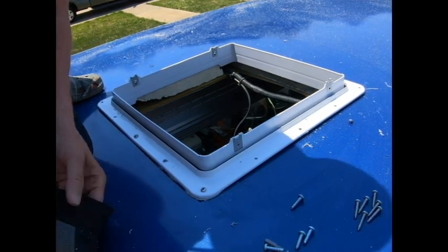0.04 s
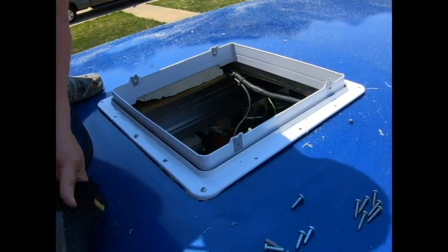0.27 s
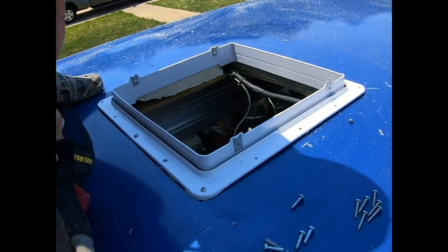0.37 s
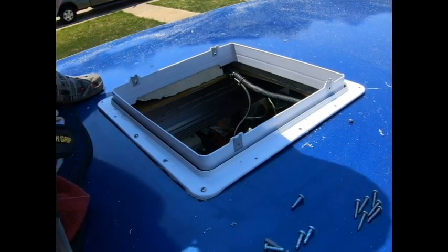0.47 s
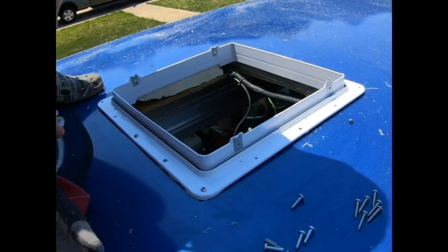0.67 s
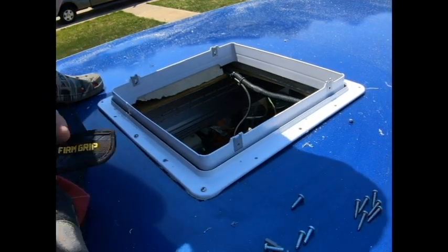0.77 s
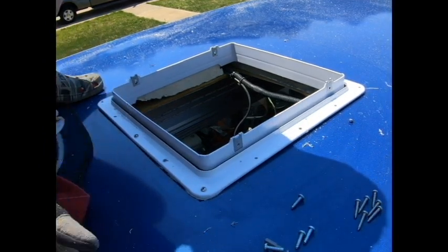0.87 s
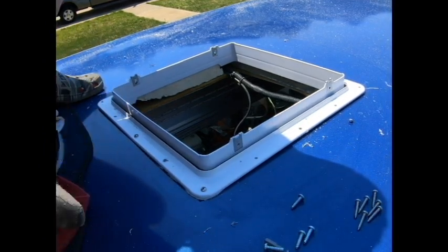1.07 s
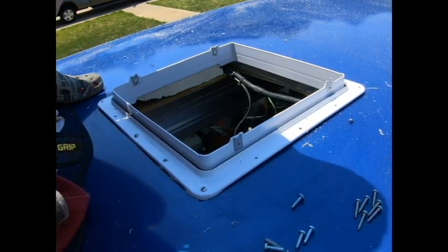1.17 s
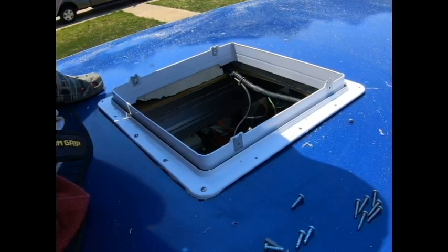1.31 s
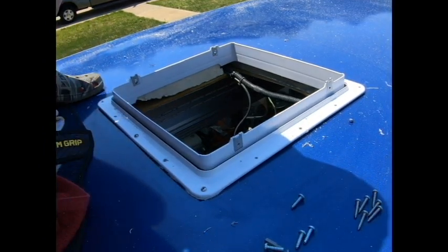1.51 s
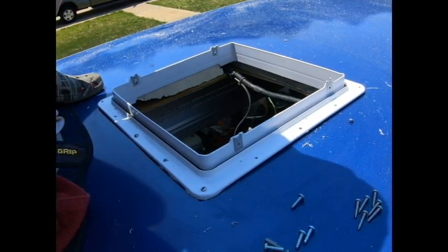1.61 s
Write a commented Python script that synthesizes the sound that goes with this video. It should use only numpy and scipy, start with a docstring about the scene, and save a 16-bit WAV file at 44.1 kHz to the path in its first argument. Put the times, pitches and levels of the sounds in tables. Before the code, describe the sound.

A tool bag lands on a van's sheet-metal roof with two low, briefly ringing thumps at about 0.15 and 0.3 seconds, its hard feet clicking with them. From 0.7 to 1.2 seconds the cloth slides softly over the paint with a thin whistle, followed by a few small scuffs until 1.6 seconds. Faint outdoor air and a low, wavering hum, probably a distant engine, continue throughout.

```python
"""A tool bag is set down on a van's sheet-metal roof: its hard feet tick, then its weight lands
in two low thumps that make the metal ring. Afterwards the cloth scuffs and slides over the paint,
making a rubbing noise with a thin whistle. Behind it a low hum, probably a far engine, wavers
over faint outdoor air."""
import sys
import numpy as np
from scipy import signal
from scipy.fft import rfft, irfft, next_fast_len
from scipy.io import wavfile
from scipy.ndimage import map_coordinates

SR = 44100
rng = np.random.default_rng(int(sys.argv[2]) if len(sys.argv) > 2 else 0)


def to_wav(sig):
    """Store sig (one row per channel, or 1-D mono) as 16-bit WAV at the path in sys.argv[1].

    Samples outside -1..1 are clipped; the rate is SR.
    """
    pcm = np.clip(np.atleast_2d(sig), -1, 1) * 32767
    pcm = np.round(pcm).astype(np.int16)
    wavfile.write(sys.argv[1], SR, pcm.T)  # frames by channels


N = 72765


def amp(db):
    """Turn decibels into a number to multiply a sound by."""
    return 10 ** (np.asarray(db) / 20)


def unit(x):
    """Scale a sound so its average strength (rms) is 1."""
    return x / np.sqrt(np.mean(x ** 2) + 1e-20)


def clock():
    """The time of each sample, in seconds."""
    return np.arange(N) / SR


def curves(rows):
    """Join a table's points with lines: one curve for each column after the time."""
    times, *columns = np.transpose(rows)
    return [np.interp(clock(), times, column) for column in columns]


def wobble(rate):
    """A smooth curve through `rate` random values a second."""
    return map_coordinates(rng.standard_normal(4096), [clock() * rate], mode="wrap")


def filtered(x, response):
    """Turn each frequency of x up or down by response(hz)."""
    size = next_fast_len(N + SR // 2)
    return irfft(rfft(x, size) * response(np.fft.rfftfreq(size, 1 / SR)), size)[:N]


def noise(colour):
    """Noise of strength 1; the colour table says which pitches are strong or weak."""
    pitches, db = np.transpose(colour)
    white = rng.standard_normal(N)
    return unit(filtered(white, lambda hz: amp(np.interp(np.log(hz + 1), np.log(pitches), db))))


def fade(start_s, rise_s, fade_s):
    """A quick rise, then a fall of 60 dB every fade_s seconds."""
    age = np.maximum(clock() - start_s, 0)
    return (1 - np.exp(-age / rise_s)) * np.exp(-np.log(1000) * age / fade_s)


def ring(start_s, rise_s, fade_s, hz):
    """One note of a struck object, dying away."""
    return fade(start_s, rise_s, fade_s) * np.sin(2 * np.pi * hz * (clock() - start_s))


def tone(hz, sway):
    """A pure tone of strength 1; sway (radians) bends its pitch a little."""
    return np.sqrt(2) * np.sin(2 * np.pi * hz * clock() + sway)


def outdoor_air(level_db=-59):
    """Open air: a faint, deep, almost steady rush."""
    # colour of the air: pitch_hz, level_db
    air_colour = [(20, -7), (45, 11.5), (85, 6.5), (120, 3), (170, 2.5), (260, 2.5), (400, -3.5), (700, -7),
                  (1500, -7.5), (2200, -9), (3100, -20.5), (4200, -16), (6200, -19), (7200, -45.5),
                  (10500, -61), (13000, -59.5), (16000, -62)]
    return amp(level_db + 0.35 * wobble(6.02)) * noise(air_colour)


def far_hum(hum_hz=60.93, octave_hz=118.2, waver_db=3, drift=1.08):
    """Probably a far engine: a low tone swells and fades under a soft, wavering drone."""
    # loudness of the lowest tone: time_s, level_db
    hum_levels = [(0, -42), (.04, -43), (.08, -48.5), (.13, -62), (.36, -33.5), (.42, -56.5), (.49, -39.5),
                  (.58, -50), (.72, -50.5), (.82, -73), (.95, -56), (1.03, -60), (1.11, -49.5),
                  (1.18, -58.5), (1.26, -42.5), (1.36, -55), (1.44, -52), (1.51, -67), (1.6, -44),
                  (1.65, -47)]
    # loudness of the drone and of the tone about an octave above the hum: time_s, drone_db, octave_db
    drone_levels = [(0, -58, -39), (.07, -57, -77.5), (.4, -59.5, -69), (.45, -68, -52), (.52, -62, -59.5),
                    (.62, -72.5, -68), (.72, -56.5, -66), (.95, -56, -75), (1.11, -59, -76),
                    (1.18, -56, -51), (1.31, -58, -63), (1.4, -56, -62), (1.52, -59, -68),
                    (1.65, -62.5, -65)]
    # colour of the drone's noise: pitch_hz, level_db
    drone_colour = [(60, -29), (115, -13.5), (165, 1), (240, 2), (320, -5), (450, -9.5), (700, -46),
                    (2000, -51)]
    # tones inside the drone: pitch_hz, level_db (added to drone_db)
    overtones = [(172, -9), (232, -3), (295, -12.5), (358, -18)]
    (hum_db,) = curves(hum_levels)
    drone_db, octave_db = curves(drone_levels)
    lowest = amp(hum_db) * tone(hum_hz, 0.3 * wobble(5))
    drone = amp(-0.5) * noise(drone_colour)
    for hz, db in overtones:
        drone += amp(db + waver_db * wobble(7.45)) * tone(hz, drift * wobble(10.06))
    octave = amp(octave_db) * tone(octave_hz, drift * wobble(15))
    return lowest + octave + amp(drone_db) * drone


def cloth_scuffs(rough_db=2.0):
    """The cloth shifts in short, grainy swells, some dull and some hissy."""
    # each scuff: peak_s, half_length_s, rub_db, hiss_db
    scuffs = [(.331, .005, -66, -72), (0.482, 0.071, -71, -67), (.58, 0.013, -59, -64),
              (0.654, 0.012, -72, -64.5), (0.719, .018, -57, -53.5), (1.253, 0.014, -52.5, -57.5),
              (1.311, 0.021, -63, -68), (1.408, 0.036, -63, -64.5), (1.553, 0.032, -60.5, -61.5),
              (1.644, 0.024, -62.5, -61)]
    # colour of the dull rub: pitch_hz, level_db
    rub_colour = [(100, -16), (400, -5.5), (750, -1), (1200, -4), (1600, -0.5), (2000, 3.5), (2500, -4),
                  (3100, -10), (6000, -40), (10000, -56)]
    # colour of the bright hiss: pitch_hz, level_db
    hiss_colour = [(1000, -26), (3000, 0), (4200, 5.5), (6200, 4.5), (7300, -11.5), (8400, -15),
                   (10500, -40), (15000, -38)]
    rub, hiss = noise(rub_colour), noise(hiss_colour)
    out = np.zeros(N)
    for peak_s, half_length_s, rub_db, hiss_db in scuffs:
        swell = np.exp(-0.5 * ((clock() - peak_s) / half_length_s) ** 2)
        out += swell * (amp(rub_db) * rub + amp(hiss_db) * hiss)
    return out * amp(rough_db * wobble(350))


def cloth_slide(rough_db=1.0, whistle_db=-3, whistle_width_hz=200):
    """Cloth slides over the paint; its thin whistle sinks as it slows."""
    # the long slide: time_s, rub_db, whistle_hz, fizz_db
    slide = [(.67, -70, 6340, -115), (.70, -59, 6380, -102), (.75, -51.5, 6250, -101),
             (.82, -52.5, 6080, -86), (.93, -55, 6020, -83.5), (1.05, -59.5, 5910, -79),
             (1.15, -59.5, 5900, -79), (1.19, -68.5, 5970, -84), (1.23, -64, 5960, -93)]
    # colour of cloth rubbing on paint: pitch_hz, level_db
    rub_colour = [(120, -19), (240, -6), (330, 9), (550, -3.5), (1400, -5), (1780, 4.5), (2100, -0.5),
                  (3100, -6.5), (4000, 4), (4700, 0), (5500, -1.5), (6500, 0.5), (7400, -11.5), (8600, -18),
                  (10500, -30), (15000, -48)]
    # colour of the very high fizz: pitch_hz, level_db
    fizz_colour = [(10500, -38), (12000, 5.5), (13300, 12.5), (14300, 4.5), (15500, -14)]
    rub_db, whistle_hz, fizz_db = curves(slide)
    moving = (clock() > slide[0][0]) & (clock() < slide[-1][0])
    phase = 2 * np.pi * np.cumsum(whistle_hz) / SR
    # fast random wobbles blur a pure tone into a breathy whistle
    blur_rate = 2 * whistle_width_hz
    whistle = unit(wobble(blur_rate) * np.sin(phase) + wobble(blur_rate) * np.cos(phase))
    rub = amp(rub_db) * (noise(rub_colour) + amp(whistle_db) * whistle)
    fizz = amp(fizz_db) * noise(fizz_colour)
    return moving * (rub + fizz) * amp(rough_db * wobble(100))


def feet_ticks():
    """The bag's hard feet click, knock and set the roof's many high notes clattering."""
    # each touch of a foot: start_s, click_db, knock_db, knock_hz, clatter_db
    touches = [(.1380, -29.5, -30, 1204, -41), (0.1543, -28, -25.5, 1345, -27.5),
               (0.161, -42, -39.5, 1000, -24), (.1700, -60, -24, 1277, -32),
               (.1960, -51.5, -52.5, 4720, -39.5), (.2750, -43, -26.5, 1580, -26)]
    # the notes a foot rings with: pitch_ratio (times knock_hz), level_db, fade_s
    foot_notes = [(1, 0, 0.0076), (1.42, -3.5, 0.014), (1.68, -10, 0.004), (2.55, -14, 0.014)]
    # colour of the click: pitch_hz, level_db
    click_colour = [(300, -22.5), (800, 3), (1200, -1), (2000, 0), (2800, -6.5), (4000, 3), (5000, -7),
                    (6200, -3), (7300, -24.5), (10000, -36.5), (15000, -45)]
    # colour of the roof's clatter: pitch_hz, level_db
    clatter_colour = [(100, 4), (300, 7), (500, -4.5), (850, -3), (1050, -10), (1300, -9), (1600, -17.5),
                      (2100, -16), (2900, -36.5), (6000, -35.5), (9000, -79)]
    out = np.zeros(N)
    for start_s, click_db, knock_db, knock_hz, clatter_db in touches:
        snap = fade(start_s, rise_s=0.00091, fade_s=0.0076)
        tail = amp(-7.5) * fade(start_s, rise_s=0.0016, fade_s=0.072)
        click = (snap + tail) * noise(click_colour)
        knock = sum(amp(db) * ring(start_s, 0.00039, fade_s, knock_hz * ratio)
                    for ratio, db, fade_s in foot_notes)
        clatter = fade(start_s, rise_s=0.0012, fade_s=0.068) * noise(clatter_colour)
        out += amp(click_db) * click + amp(knock_db) * knock + amp(clatter_db) * clatter
    return out


def bag_thumps():
    """The bag's weight lands twice; where it falls decides how strongly each roof note rings."""
    # the metal roof's own notes: pitch_hz, first_spot_db, second_spot_db, fade_s
    roof_notes = [(59.89, -23, -39.5, 0.9), (93, -13, -35, 0.21), (119, -14.5, -54, 0.23),
                  (129, -43.5, -15.5, 0.26), (144.5, -13, -29.5, 0.25), (176.3, -5.5, -17.5, 0.097),
                  (200.5, -5.5, -19.5, 0.13), (208.3, -3, -49, 0.075), (232.5, -8.5, -39, 0.058),
                  (289.5, -18.5, -22.5, .11), (318, -33.5, -27.5, 0.068), (443.6, -34.5, -26, 0.09),
                  (578, -23, -34, 0.07), (716, -39.5, -50, 0.041), (843.4, -24, -36.5, 0.078),
                  (1340, -37.5, -76.5, 0.14)]
    # one landing on each spot: start_s, level_db, contact_s
    landings = [(.1511, 0, 0.0059), (.2813, -4, 0.0013)]
    out = np.zeros(N)
    for spot, (start_s, level_db, contact_s) in enumerate(landings):
        for k, (hz, *spot_db, fade_s) in enumerate(roof_notes):
            direction = (-1) ** k  # neighbouring notes swing opposite ways
            out += direction * amp(level_db + spot_db[spot]) * ring(start_s, contact_s, fade_s, hz)
    return out


def scene():
    """Add the air, the hum, the cloth and the bag into one channel."""
    return (outdoor_air() + far_hum() + cloth_scuffs() + cloth_slide() + feet_ticks() + bag_thumps())[None]


def record(dry, low_cut_hz=29, top_hz=15700):
    """Thin the deepest bass and remove the very highest treble."""
    bass_cut = signal.butter(3, low_cut_hz, "highpass", fs=SR, output="sos")
    thinned = signal.sosfilt(bass_cut, dry[0])
    return filtered(thinned, lambda hz: hz < top_hz)[None]


dry = scene()
out = record(dry)
to_wav(out)
```